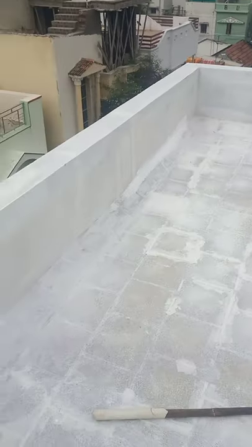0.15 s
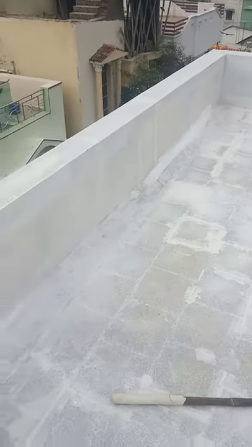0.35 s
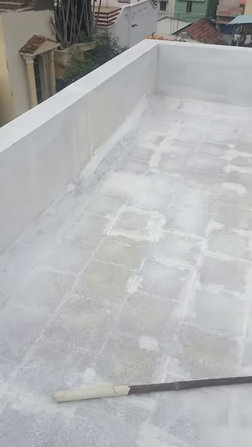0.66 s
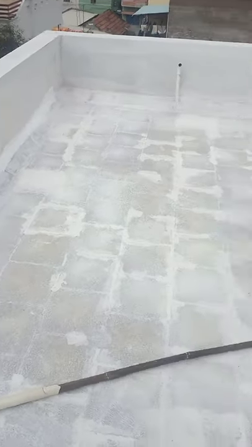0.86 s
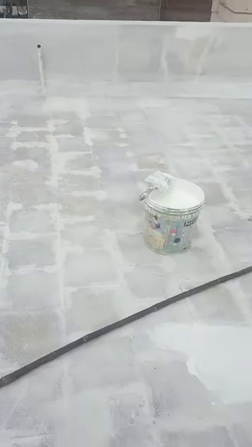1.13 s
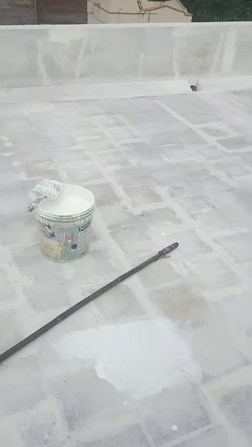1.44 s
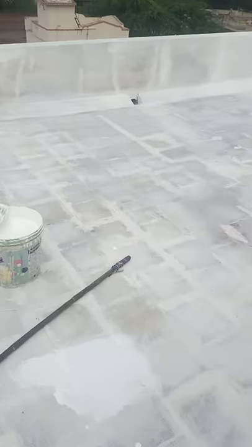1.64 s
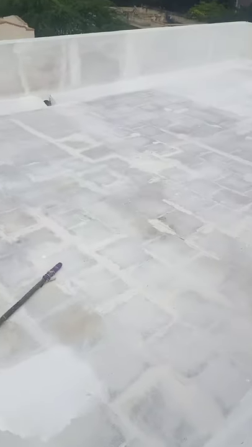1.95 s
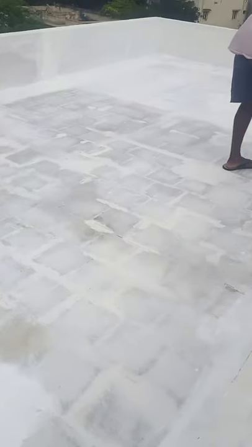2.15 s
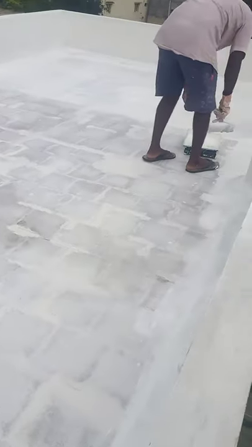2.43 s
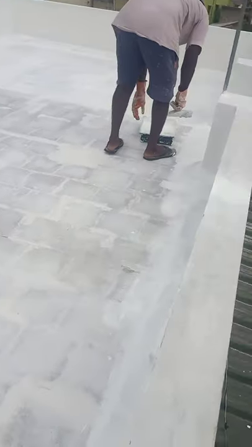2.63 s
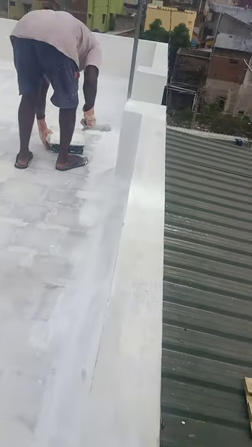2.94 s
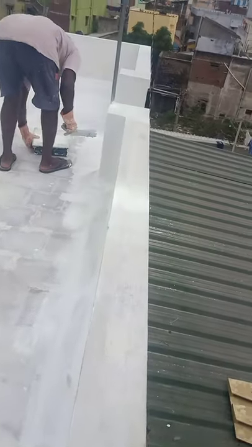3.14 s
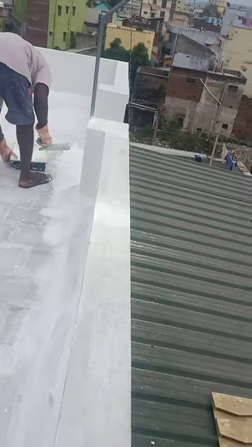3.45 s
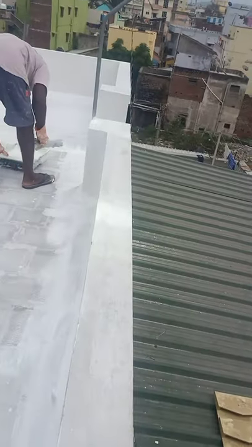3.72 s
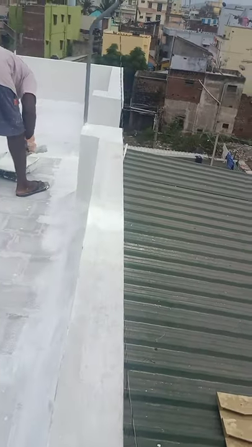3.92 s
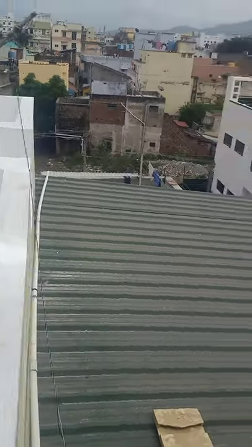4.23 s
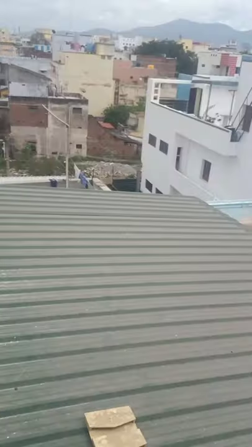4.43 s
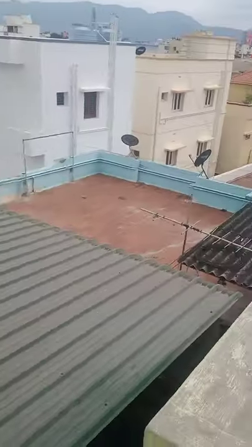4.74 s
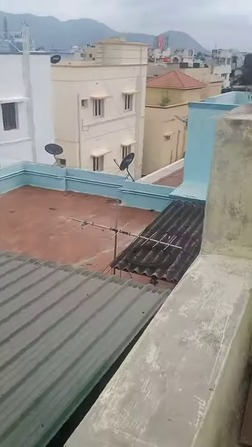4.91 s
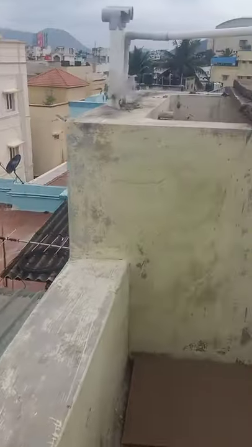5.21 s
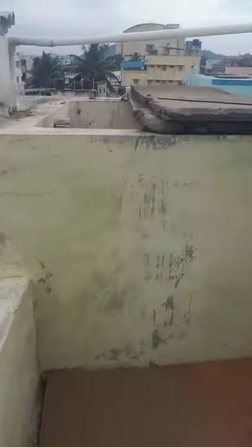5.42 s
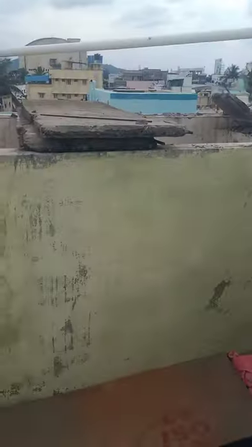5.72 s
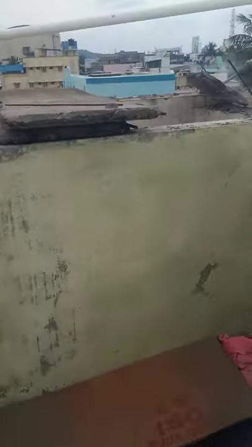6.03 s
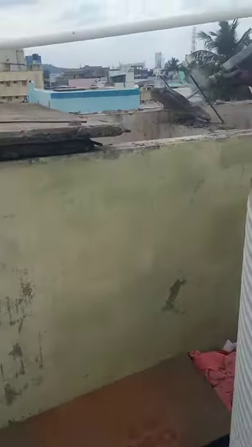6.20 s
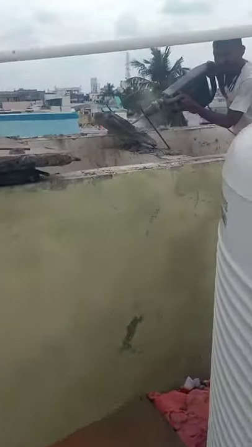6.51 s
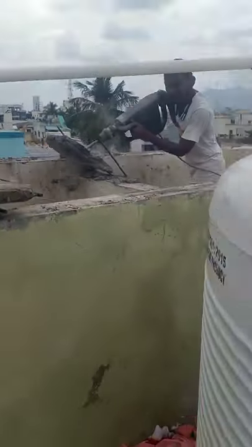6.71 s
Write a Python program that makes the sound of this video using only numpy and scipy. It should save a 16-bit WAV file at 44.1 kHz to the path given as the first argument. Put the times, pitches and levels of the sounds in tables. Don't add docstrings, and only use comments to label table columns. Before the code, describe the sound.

On a flat roof outdoors, an electric demolition hammer's motor whirrs over faint town rumble while loose steel clanks. Hesitant blows build into a rapid hammering run, fade out, and a pause follows with knocks of rubble and a few weak blows. A brighter, harsher second run then hammers on, gradually weakening. Phone microphone some metres away, with short parapet echoes.

```python
import sys
import numpy as np
from scipy import signal
from scipy.fft import rfft, irfft
from scipy.io import wavfile
from scipy.ndimage import uniform_filter1d

SR = 44100
rng = np.random.default_rng(int(sys.argv[2]) if len(sys.argv) > 2 else 0)


def invert_db(level):
    return 10 ** (np.asarray(level, dtype=float) / 20)


def store_wav(level_fs):
    pcm = np.round(np.clip(np.atleast_2d(level_fs), -1, 1) * 32767)
    wavfile.write(sys.argv[1], SR, pcm.T.astype(np.int16))


N = 302526
BLOW_SAMPLES, LEAD_SAMPLES = 4096, 440

# (time [s], strength [dB], sharpness [dB])
LOOSE = [(1.094, -34.5, -30), (1.181, -23, -12), (1.222, -18.5, -11), (1.265, -13, -14), (1.36, -25, -16),
         (1.434, -37, 3), (1.518, -18.5, -16.5), (1.555, -12.5, -12), (1.637, -11, -18), (1.677, -9, -14),
         (1.76, -11.5, -20.5), (1.801, -7, -17), (1.881, -6, -19.5), (2.804, -26, -15), (4.024, -29, -50),
         (4.066, -23, -12), (4.107, -16, -19), (4.149, -13.5, -14), (4.201, -25, -8), (4.267, -22, -13),
         (4.172, -35, -3), (4.285, -20, -16), (5.313, -16.5, -7), (5.382, -13, -2.5), (5.424, -10, -5.5)]
# (time [s], strength [dB], sharpness [dB])
RUNS = [(1.9642, -4, -16.5), (2.0043, -4.5, -18), (2.0454, -5, -17.5), (2.0877, -6.5, -15),
        (2.1291, -8.0, -16.5), (2.1699, -11, -10.5), (2.2105, -10, -18.5), (2.2532, -13, -18),
        (2.2941, -10, -19.5), (2.3348, -10.5, -17.5), (2.3764, -10.5, -19), (2.4173, -10, -15),
        (2.4594, -9.5, -14), (2.5012, -12.5, -15), (2.5438, -14.5, -16.5), (2.5829, -13.5, -19),
        (2.625, -13.5, -15), (2.6664, -16, -14), (2.7082, -15.5, -15), (2.7495, -19, -10.5),
        (5.4659, -9.5, -4.5), (5.5063, -7, -7.5), (5.5466, -7.5, -5), (5.5878, -4, -10), (5.6284, -6, -9.5),
        (5.6707, -9.5, -9.5), (5.713, -8.5, -7), (5.7526, -12.5, -3.5), (5.7933, -7.5, -6),
        (5.8362, -11.5, -5), (5.877, -9.5, -2.5), (5.917, -8, -6.5), (5.958, -11.5, -3),
        (5.9988, -10, -3.5), (6.0403, -9.5, -3), (6.082, -10.5, -5), (6.1234, -9, -6.5),
        (6.1652, -11, -9.5), (6.2055, -10.5, -6.5), (6.2483, -13.5, -5.5), (6.2893, -12.5, -8.5),
        (6.3305, -12.5, -7.0), (6.3721, -14.0, -11.5), (6.4125, -17.5, -4), (6.4543, -20, -6.5),
        (6.495, -20.5, -8), (6.5375, -19, -5), (6.5797, -21.5, -3.5), (6.6205, -17.5, -11.5),
        (6.6613, -25, -5), (6.701, -22, -10), (6.7448, -23, -10), (6.7859, -20.5, -14), (6.828, -17, -16)]
# (time [s], bite around 2 kHz [dB], slab thud [dB], slab broken through [0-1])
BITE = [(1.1, -10, -1.5, 0), (1.3, -22, -10.5, 0), (1.55, -14, -12, 0.1), (1.9, -11.5, -15, 0.14),
        (2.2, -4.5, -14, 0), (2.45, -8.5, -16.5, 0.01), (2.7, -9.5, -18.5, 0), (4.1, -9, -32, 0.2),
        (4.4, -17, -45, 0.1), (5.4, 4.5, -14, 0), (5.6, 3.5, -18, 0.14), (5.85, 3.5, -14.5, 0),
        (6.0, 7, -16, 0.77), (6.3, 3.5, -17.5, 1.06), (6.55, 5.5, -18, 0), (6.65, 6, -31, 0.7),
        (6.86, 1.5, -36, 0.5)]
# (time [s], level over the blow [dB])
SNAP = [(1.1, -24), (1.6, -12), (1.9, 3), (2.3, -24), (2.44, 1), (2.6, 5.5), (2.72, -0.5), (4.1, -2),
        (5.4, -8), (5.9, -26.5), (6.3, 3), (6.55, -21), (6.65, -3), (6.86, -8)]
# (frequency [Hz], density [dB per Hz])
CRACK_HIDDEN = [(47, -60), (80, -33), (411, -14), (459, 1.5), (599, -7.5), (816, -0.5), (1090, 0.5),
                (2750, 4), (3250, -4), (3840, -13), (6670, -19), (8140, -41.5), (13200, -48), (15800, -45)]
# (frequency [Hz], density [dB per Hz])
CRACK_OPEN = [(80, -56), (220, 1.5), (400, -9), (800, 1.5), (1500, -6), (2000, -2.5), (3200, -11.5),
              (5000, -14.5), (6800, -5.5), (8200, -28), (10000, -31.5), (12200, -41), (14500, -33),
              (15800, -72.5)]
# (frequency [Hz], level [dB], t60 [s])
SLAB_HIDDEN = [(383, 0.5, 0.044), (500, -29, 0.077), (574, 5, 0.058), (1030, 6, 0.026), (1120, -21, 0.052),
               (1700, -9, 0.035), (2440, -16, 0.036), (2670, -14, 0.051), (3100, -9, 0.036)]
# (frequency [Hz], level [dB], t60 [s])
SLAB_OPEN = [(247, -5.5, 0.088), (353, -4, 0.21), (769, 1, 0.044), (1020, 1.5, 0.024), (918, 12.5, 0.031),
             (1270, 0, 0.1), (1534, -1, 0.063), (1890, 8, 0.036), (2540, -4, 0.037)]
# (frequency [Hz], level [dB], t60 [s])
SLAB_BROKEN = [(150, -5, 0.089), (235.5, -8, 0.099), (668, 7, 0.07), (782, 14.5, 0.04), (1000, -14, 0.02),
               (1490, 9, 0.046), (1994, 7, 0.045), (2570, 12, 0.046)]
# (frequency [Hz], level [dB], t60 [s])
SHANK = [(5165, -10, .028), (5720, 2, .045), (6650, -1, .012)]
# (frequency [Hz], level [dB], t60 [s])
CHISEL = [(9085, 0, .026), (10090, -6, .035), (11400, -22, .012), (13000, -3, .028), (13300, -14, .008),
          (15200, -22, .012)]
# (time [s], load as level [dB], gear side facing the phone [dB], slab boom [dB])
WHIRR = [(0, -33, -6, 3.5), (.6, -33.5, -5, 3.5), (.86, -33, -3, 1.5), (1.16, -35.5, -1, 11.5),
         (1.5, -27.5, -6, 2.5), (1.75, -34.5, -1.5, 12), (2.03, -19.5, -9.5, -11), (2.33, -25, -2.5, -3),
         (2.65, -28.5, -21, 0), (2.82, -39.5, -1, 1), (3.3, -39, 1, 3), (4.03, -35, -0.5, -1.5),
         (4.2, -31.5, 1.5, 0.5), (4.6, -32, -0.5, 3.5), (5.16, -30, 0.5, 0), (5.45, -26.5, -0.5, -1),
         (6.18, -20.5, -7, -10.5), (6.68, -37.5, -0.5, 3)]
WHIRR_BANDS_HZ = [130, 430, 680, 1400, 4200, 7600, 16000]
# (idle level [dB], share of load [dB/dB], share of facing [dB/dB])
LAYERS = [
    (-49.5, 1.96, 1.85),
    (-40, 1.8, 0.25),
    (-36.5, 0.87, 0.16),
    (-33.5, 1.03, 1.52),
    (-44.5, 0.96, 1),
    (-71, 1.9, 6),
]
# (frequency [Hz], density [dB per Hz])
WHIRR_COLOUR = [(15, -43), (25, -38), (102, -23), (161, 3), (211, 12), (284, -1), (542, -21), (710, -1),
                (905, -1), (1250, -0.5), (1510, -6), (3490, -10), (6660, -26), (8270, -36.5), (15800, -63)]
# (frequency [Hz], width [Hz], gain [dB])
HOUSING = [(590, 48, -6), (866, 42, 2), (1150, 130, 2.5), (1870, 49, 10.5), (2920, 300, 4), (6500, 450, 9),
           (10500, 900, -2.5), (13300, 1800, 14)]
# (frequency [Hz], likeness [0-1])
SAME = [(30, .6), (130, .97), (400, .92), (1500, .85), (4000, .75), (15000, .6)]
# (time [s], level [dB], half length [s])
HUMS = [
    (0.824, -46, 0.13),
    (1.996, -42, 0.65),
    (4.996, -45, 0.46),
    (5.546, -50, 0.19),
    (6.093, -52, 0.68),
]
# (time [s], peak [dB], frequency [Hz], t60 [s], grit [dB])
LUMPS = [(.527, -20, 3660, 0.067, -59), (3.462, -14, 364, 0.049, -12.5), (3.484, -19.5, 200, 0.16, -4.5),
         (3.48, -16, 128, 0.063, -21), (4.025, -17, 1120, 0.023, -15), (4.1, -23, 1100, 0.034, -2),
         (4.304, -21, 314, 0.087, -23), (4.767, -7, 579, 0.067, -19.5), (4.771, -2, 420, 0.027, -21.5),
         (4.777, -27, 220, 0.052, -11), (4.795, -11, 452, 0.034, -23), (4.896, -33.5, 4680, 0.2, -28),
         (4.931, -18, 570, 0.048, -11), (4.971, -13, 2570, 0.043, -32), (5.02, -25, 531, 0.25, -30),
         (5.092, -16.5, 350, 0.063, -24), (4.774, -10.5, 900, 0.032, -24), (4.782, -7, 515, 0.028, -21),
         (4.786, -15, 794, 0.043, -12.5), (4.805, -18, 402, 0.023, -6), (4.063, -19.5, 1220, 0.038, -22),
         (4.108, -9, 950, 0.025, -28), (4.168, -18.5, 1120, 0.044, -6.5), (4.178, -13.5, 1000, 0.051, -16),
         (4.238, -28, 740, 0.075, -8), (4.26, -18, 1097, 0.056, -10), (4.297, -17.5, 787, 0.033, -9),
         (4.341, -18, 860, 0.039, -27), (4.357, -17, 970, 0.028, -9.5), (4.519, -23, 760, 0.044, -8),
         (4.43, -21, 720, 0.06, -4), (4.48, -19.5, 798, 0.072, -12), (4.025, -21, 1430, 0.019, -21),
         (4.586, -26, 710, 0.036, -21), (4.91, -19, 366, 0.039, -21)]
# (time [s], peak [dB], frequency [Hz], t60 [s])
CLANKS = [(.005, -26.5, 860, 0.051), (.01, -30, 534, 0.095), (.097, -34, 700, 0.1), (0.194, -32, 542, 0.48),
          (.205, -35, 850, 0.63), (.23, -28, 700, 0.12), (0.339, -30, 1114, 0.065), (.403, -33, 830, 0.14),
          (.403, -26.5, 716, 0.16), (.46, -34, 705, 0.12), (.566, -25, 820, 0.035),
          (0.685, -27, 1330, 0.067), (.69, -35, 850, 0.1), (0.849, -28.5, 996, 0.073),
          (0.931, -24.5, 1020, 0.046), (.997, -26, 523, 0.061), (3.119, -25.5, 1816, 0.051),
          (3.16, -29, 1460, 0.047), (3.239, -25.5, 1087, 0.045), (3.407, -26, 1136, 0.022),
          (3.611, -25, 1150, 0.028), (3.719, -35, 573, 0.15), (3.798, -35, 650, 0.14),
          (3.819, -27.5, 1230, 0.059), (3.856, -42, 1250, 0.051), (3.865, -29, 577, 0.082),
          (3.882, -45, 635, .08), (3.985, -22.5, 1700, 0.025)]
# (time [s], peak [dB])
TICKS = [(4.9277, -33), (4.9561, -33), (4.9736, -26), (4.9944, -33), (5.0155, -22), (5.0365, -23),
         (5.0564, -27), (5.0789, -20), (5.0954, -32), (5.1751, -27), (5.2016, -34), (5.242, -28)]
# (delay [s], left gain, right gain)
ECHOES = [(.0045, -0.48, 0.3), (.0098, 0.0037, -0.095), (0.0163, 0.24, 0.14), (.024, 0.4, -.25),
          (.0335, 0.29, 0.079)]
# (frequency [Hz], t60 [s])
ROOF = [(100, 0.67), (500, 0.32), (2000, 0.2), (6000, 0.022), (15000, 0.16)]
# (time [s], level [dB], half length [s])
SWELLS = [(0.573, -46, 0.36), (1.65, -48, 0.6), (2.35, -47, 0.75), (0.023, -55, 0.11), (3.1, -78, 0.24),
          (3.51, -47, 0.045), (3.664, -52, 0.058), (4.053, -65, 0.091), (4.355, -46.5, 0.25),
          (4.85, -57, 0.13), (5.784, -59, 0.6)]
# (time [s], left port lag [samples], left-right [dB], open view [0-1])
FACING = [(0, -3.5, -1.5, 0), (.7, -5, -4, 0), (1.3, -3.5, -0.5, 0), (1.8, -1.5, -0.4, 0),
          (2.7, -1.5, -4, 0.01), (3.8, -2.5, -3, 0), (4.3, 3.5, -4, 0.45), (4.8, 7.5, -7.5, 0.4),
          (5.3, 8.5, -3, 0.92), (6.1, 10, -3, 0.87), (6.86, 8, -3.5, 0.79)]
STARVED_HZ = [7750, 8650, 9600, 10700, 11700, 12700, 13700, 14700]
STARVE_DB = np.array([[1], [-7], [-7], [-5], [-5], [-9], [-9]])


def hammer():
    blows = np.array(LOOSE + RUNS)
    s, strength_db, sharp_db = blows[np.argsort(blows[:, 0])].T[:, :, None]
    s = s[:, 0]
    early = (np.arange(BLOW_SAMPLES) - LEAD_SAMPLES) / SR  # s, negative before contact
    t = np.maximum(early, 0)
    view = np.clip(curve(FACING, s)[2][:, None], 0, 1)
    bite_db, thud_db, broken = curve(BITE, s)[:, :, None]
    crack, scatter = cracking(early, view, strength_db, sharp_db, bite_db, thud_db)
    thud = invert_db(thud_db) * slab(t, view, broken)
    steel = chisel(t, view, sharp_db)
    tones = invert_db(strength_db + 2.5) * (tip_snap(early, s) + thud + steel)
    grit = crumble(t, view, strength_db + bite_db)
    return placed(s - LEAD_SAMPLES / SR, crack + tones + grit[:, 0], scatter + 1.1 * grit[:, 1])


def cracking(early, view, strength_db, sharp_db, bite_db, thud_db):
    count, t = len(view), np.maximum(early, 0)
    hz = np.fft.rfftfreq(BLOW_SAMPLES, 1 / SR)
    shape = (1 - np.exp(-t / .0005)) * (np.exp(-t / .0017) + .17 * np.exp(-t / .014))
    shape += np.where(early < 0, 0.3 * np.exp(early / 0.01), 1.72 * np.exp(-t / 0.0076))
    shape += 0.028 * np.exp(-((early + 0.0023) / 0.00033) ** 2)
    rattle_db = -15 + 5.1 * np.clip(rng.standard_normal((count, 1)), -2, 1.5)
    rattle = invert_db(rattle_db) * (early < 0) * np.exp(-abs(early) / 0.015)

    colour_db = (1 - view) * read(CRACK_HIDDEN, hz) + view * read(CRACK_OPEN, hz)
    treble = np.clip(np.log2(hz / 3000 + 1e-9), 0, 1)
    middle = np.exp(-np.log2(hz / (2600 - 500 * view) + 1e-9) ** 2 / .8)
    colour_db += treble * (sharp_db + 6.5 + 9 * (1 - view)) + middle * bite_db
    colour_db += np.minimum(thud_db + 29.5, 0) * 0.61 / (1 + (hz / 650) ** 4)
    mirrored_db = np.hstack([colour_db, colour_db[:, -2:0:-1]])
    log_gain = np.log(invert_db(np.maximum(mirrored_db, -100)))
    causal = np.exp(np.conj(signal.hilbert(log_gain, axis=1)))[:, :BLOW_SAMPLES // 2 + 1]

    fresh = np.minimum(hz / 2800, 1)
    alike = rfft(creeping((count, BLOW_SAMPLES), keep=.8) * shape)
    alike -= 11.5 * np.exp(-2j * np.pi * hz * (LEAD_SAMPLES + 12) / SR)
    noise = rng.standard_normal((count, 2, BLOW_SAMPLES)).transpose(1, 0, 2)
    new, other = rfft(noise * (shape * (.5 + 0.71 * np.exp(-t / 0.0052)) + rattle))
    crack = irfft((np.sqrt(1 - fresh ** 2) * alike + fresh * new) * causal, BLOW_SAMPLES)
    scatter = .7 * irfft(other * causal * np.minimum(hz / 4500, 1), BLOW_SAMPLES)
    peak = uniform_filter1d(abs(crack), size=60).max(1, keepdims=True)
    gain = invert_db(strength_db + 5.5) / peak / 2.59
    return gain * crack, gain * scatter


def tip_snap(early, s):
    u = (np.pi * 1600 * (early - .0008)) ** 2
    return invert_db(curve(SNAP, s)[0][:, None]) * (2 * u - 1) * np.exp(-u)


def slab(t, view, broken):
    hidden, whole, holed = (rings(modes, t, 2.0, .015, len(view), keep=.78)
                            for modes in (SLAB_HIDDEN, SLAB_OPEN, SLAB_BROKEN))
    return (1 - view) * hidden + view * ((1 - broken) * whole + broken * holed)


def chisel(t, view, sharp_db):
    ring_hidden_db, ring_open_db, ring_spread_db, ring_per_sharp = -36, -29, 6, 0.19
    steel = invert_db(sharp_db - 10.5) * rings(SHANK, t, 2.5, .004, len(view), keep=.3)
    ring_db = (1 - view) * ring_hidden_db + view * ring_open_db + ring_per_sharp * (sharp_db + 12.5)
    steel += invert_db(ring_db) * rings(CHISEL, t, ring_spread_db, 1 / 300, len(view), keep=0.23)
    return steel * (1 - np.exp(-t / 0.00088))


def crumble(t, view, level_db):
    hidden_db, open_db = -13, -30
    size = (len(view), 2, BLOW_SAMPLES)
    grit = rng.standard_normal(size) * invert_db(9.8 * rng.standard_normal(size))
    grit = evened(band_pass(grit, 1310, 3020, order=6))
    grit *= (1 - np.exp(-t / 0.0027)) * np.exp(-t / 0.046)
    return grit * invert_db(level_db + (1 - view) * hidden_db + view * open_db)[:, None]


def rings(modes, t, spread_db, detune, count, keep):
    hz, db, t60_s = np.transpose(modes)[:, None, :, None]
    t60_s = np.minimum(t60_s, .07)
    luck = creeping((count, len(modes), 2), keep)
    level = invert_db(db + spread_db * luck[..., :1] - 60 * t / t60_s)
    return (level * np.sin(2 * np.pi * hz * (1 + detune * luck[..., 1:]) * t)).sum(1)


def whirr():
    idle_load_db, throb_hz = -34, 22.0
    frames, hz = N // 128 + 5, np.fft.rfftfreq(512, 1 / SR)
    t = np.arange(frames) * 128 / SR
    a, b, c, d, patches = rng.standard_normal((frames, 257, 5)).T
    patches = uniform_filter1d(patches, size=5, axis=0)
    patches = evened(uniform_filter1d(patches, size=12, axis=1, mode="wrap"))
    flicker = evened(uniform_filter1d(rng.standard_normal(frames), size=3))
    throb = np.cos(2 * np.pi * throb_hz * t + 2.03)

    housing_db = sum(db / (1 + (2 * (hz - f) / w) ** 2) for f, w, db in HOUSING)
    colour = invert_db(read(WHIRR_COLOUR, hz) + housing_db)
    band = np.clip(np.digitize(hz, WHIRR_BANDS_HZ) - 1, 0, len(LAYERS) - 1)
    share_db = 10 * np.log10(np.bincount(band, colour ** 2))
    load_db, facing_db, boom_db = curve(WHIRR, t)
    idle_db, by_load, by_facing = np.transpose(LAYERS)[:, :, None]
    layer_db = idle_db + by_load * (load_db - idle_load_db) + by_facing * facing_db
    layer_db[:2] += boom_db
    level_db = uniform_filter1d((layer_db - share_db[:, None])[band], size=3, axis=0)

    lag, pan_db, _ = curve(FACING, t)
    pan_db = pan_db * shaded(hz)[:, None]
    same = np.clip(read(SAME, hz), 0, 1)[:, None]
    left = a + 1j * b
    right = same * left + np.sqrt(1 - same ** 2) * (c + 1j * d)
    right = right * np.exp(2j * np.pi * hz[:, None] * lag / SR)
    z = np.array([left * invert_db(pan_db / 2), right / invert_db(pan_db / 2)]) * colour[:, None]
    z *= invert_db(level_db + 1.1 * patches + 0.85 * flicker + 1.3 * throb + 0.4)
    return signal.istft(z, nperseg=512, noverlap=384)[1][:, :N]


def hum():
    hum_hz, width_hz = 216.1, 9.8
    t = np.arange(N) / SR
    note = evened(band_pass(rng.standard_normal(N), hum_hz - width_hz, hum_hz + width_hz))
    return note * swelling(HUMS, t)


def rubble():
    clank_grit_db = -14.5
    tick_hz, tick_t60_s, tick_grit_db = 6730, 0.023, -30
    lumps = LUMPS + [(*row, clank_grit_db) for row in CLANKS]
    lumps = lumps + [(*row, tick_hz, tick_t60_s, tick_grit_db) for row in TICKS]
    s, db, hz, t60_s, grit_db = np.transpose(lumps)[:, :, None]
    t = np.arange(8192) / SR
    wobble, drift, grit, scatter = rng.standard_normal((len(lumps), 4, 8192)).transpose(1, 0, 2)
    wobble = 1 + 0.2 * evened(uniform_filter1d(wobble, size=400))
    drift = 0.99 * np.minimum(600 / hz, 1) * evened(uniform_filter1d(drift, size=400))
    shape = invert_db(db) * (1 - np.exp(-t / 0.001))
    puff = shape * invert_db(grit_db - 60 * t / 0.093)
    knock = shape * np.sin(2 * np.pi * hz * t + drift) * wobble * invert_db(-60 * t / t60_s)
    grit = puff * evened(band_pass(grit, 360, 1800))
    scatter = 0.75 * puff * evened(band_pass(scatter, 580, 3400))
    return placed(s[:, 0], knock + grit, scatter)


def roof(x):
    echo_loss_open, tail_loss_open, tail_rise_s = 0.77, .5, .02
    taps = np.zeros((2, SR // 2))
    at = np.arange(200, SR // 2 - 20, 20) + rng.integers(0, 20, (2, (SR // 2 - 201) // 20))
    np.put_along_axis(taps, at, rng.choice([-1., 1.], at.shape), 1)
    hz, t, z = signal.stft(taps, SR, nperseg=256)
    tail = signal.istft(z * invert_db(-60 * t / read(ROOF, hz)[:, None]), SR, nperseg=256)[1]
    tail *= 1 - np.exp(-np.arange(tail.shape[1]) / SR / tail_rise_s)
    tail *= invert_db(-8.0) / np.linalg.norm(tail[0])
    apart = .5 * band_pass(tail[1], 800, 15000)
    tail = np.array([tail[0] + apart, tail[0] - apart])
    hard = np.zeros((2, 2000))
    for delay_s, *gains in ECHOES:
        hard[:, round(delay_s * SR)] += gains
    walls = signal.lfilter([.55], [1, -.45], x)
    view = curve(FACING, np.arange(N) / SR)[2]
    shut = 1 - np.clip(echo_loss_open * view, 0, 1)
    late = signal.fftconvolve((1 - tail_loss_open * view) * walls, tail, axes=1)[:, :N]
    return late + signal.fftconvolve(shut * walls, hard, axes=1)[:, :N]


def town():
    floor_db = -73
    a, b = evened(band_pass(rng.standard_normal((2, N)), 59.5, 146, order=3))
    level = invert_db(floor_db) + swelling(SWELLS, np.arange(N) / SR)
    return np.array([a + .4 * b, a - .4 * b]) * level


def placed(times_s, sounds, scatter):
    lag, pan_db, _ = curve(FACING, times_s)[:, :, None]
    size, margin = sounds.shape[1], 16
    late = np.exp(-1j * np.pi * np.arange(size // 2 + 1) / size * lag)
    pan_db = pan_db * shaded(np.fft.rfftfreq(size, 1 / SR))
    at = np.round(times_s * SR).astype(int)[:, None] + np.arange(size) - margin
    out = np.zeros((2, N + size))
    for side, turn in enumerate((late * invert_db(pan_db / 2), 1 / late / invert_db(pan_db / 2))):
        port = np.roll(sounds + (-1) ** side * scatter, margin, 1)
        np.add.at(out[side], at, irfft(rfft(port) * turn, size))
    return out[:, :N]


def shaded(hz):
    return hz ** 2 / (hz ** 2 + 607 ** 2)


def creeping(shape, keep):
    return signal.lfilter([np.sqrt(1 - keep ** 2)], [1, -keep], rng.standard_normal(shape), axis=0)


def swelling(table, t):
    return sum(invert_db(db) * np.exp(-((t - s) / half_s) ** 2) for s, db, half_s in table)


def band_pass(x, lo_hz, hi_hz, order=2):
    return signal.sosfilt(signal.butter(order, [lo_hz, hi_hz], "band", fs=SR, output="sos"), x)


def evened(x, axis=None):
    return x / np.sqrt(np.mean(x ** 2, axis, keepdims=True) + 1e-20)


def read(points, hz):
    f, value = np.transpose(points)
    return np.interp(np.log(hz + 1), np.log(f + 1), value)


def curve(table, t):
    s, *columns = np.transpose(table)
    return np.array([np.interp(t, s, c) for c in columns])


def scene():
    blown = band_pass(hammer(), 174, 17000, order=4)
    fallen = band_pass(rubble(), 130, 6450, order=5)
    echoes = roof(blown + invert_db(-5) * fallen)
    motor = band_pass(whirr(), 91, 18000, order=4)
    return blown + fallen + echoes + motor + town() + hum()


def starved(x):
    luck_db = 5
    hz, _, z = signal.stft(x, SR, nperseg=1024)
    band = np.digitize(hz, STARVED_HZ)
    inside = band == np.arange(1, len(STARVED_HZ))[:, None]
    power = inside @ (abs(z) ** 2).sum(0) / inside.sum(1)[:, None]
    power_db = 10 * np.log10(power + 1e-20)
    luck = evened(uniform_filter1d(rng.standard_normal(power_db.shape), size=3))
    kept = power_db - power_db.mean(0) + luck_db * luck > STARVE_DB
    kept = np.vstack([np.ones_like(kept[:1]), kept, kept[:1]])
    return signal.istft(z * kept[band], SR, nperseg=1024)[1][:, :N]


def top_cut(x):
    return signal.sosfilt(signal.butter(12, 15850, fs=SR, output="sos"), x)


def record(dry):
    thin = signal.sosfilt(signal.butter(4, 50, "high", fs=SR, output="sos"), dry)
    rounded = 1.05 * np.tanh(thin / 1.05)
    edge = signal.firwin(255, 15750, window=("kaiser", 9), fs=SR)
    mix = signal.oaconvolve(starved(rounded), edge[None], "same")
    return top_cut(mix)


dry = scene()
out = record(dry)
store_wav(out)
```